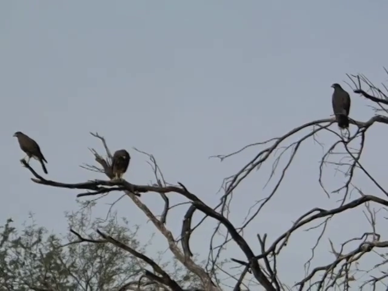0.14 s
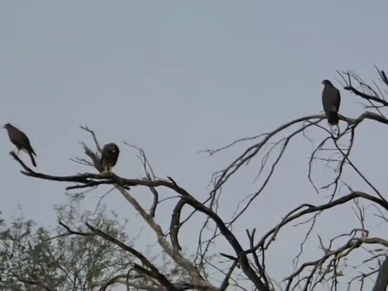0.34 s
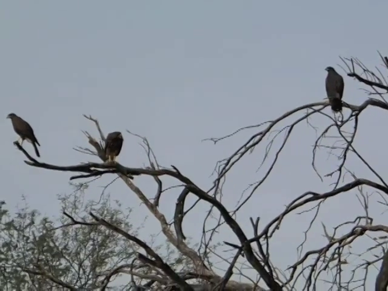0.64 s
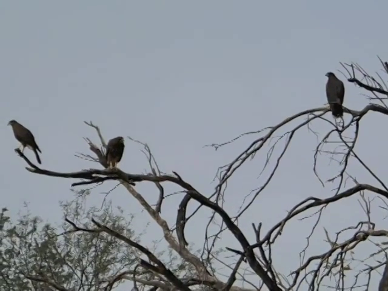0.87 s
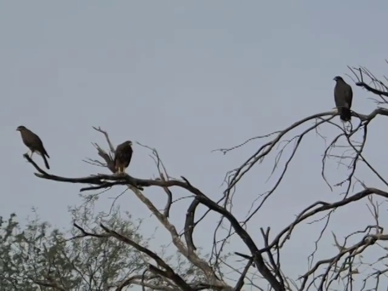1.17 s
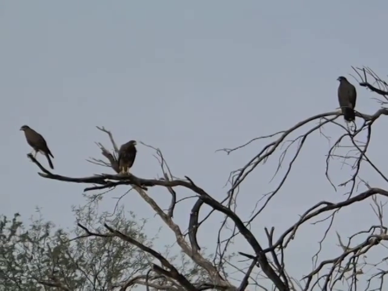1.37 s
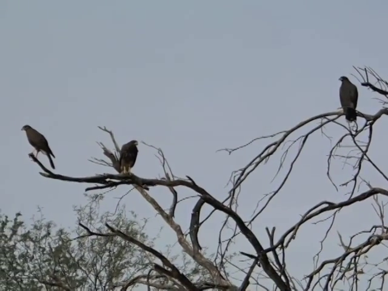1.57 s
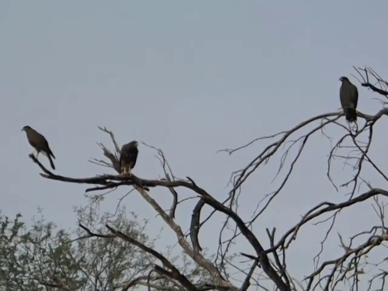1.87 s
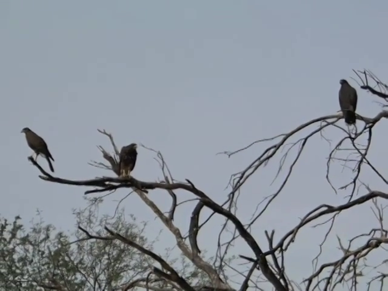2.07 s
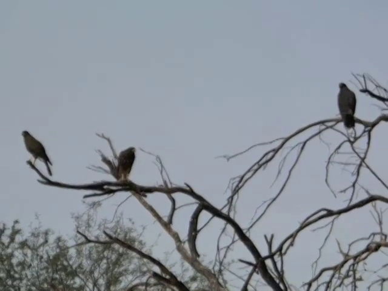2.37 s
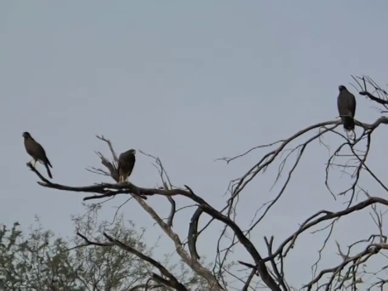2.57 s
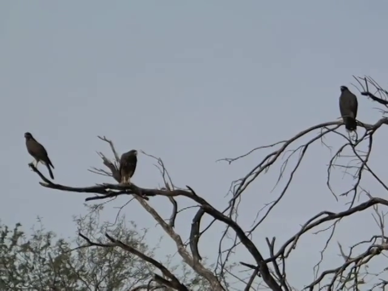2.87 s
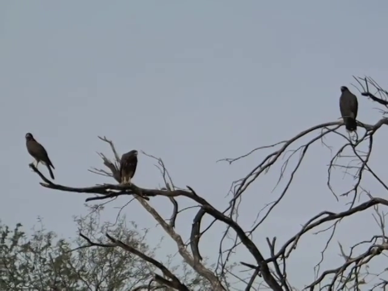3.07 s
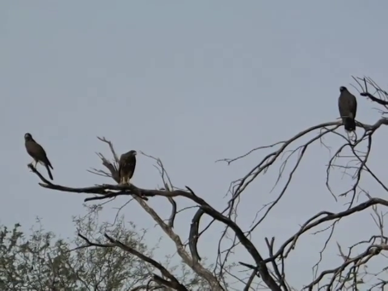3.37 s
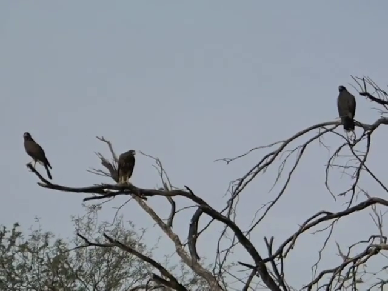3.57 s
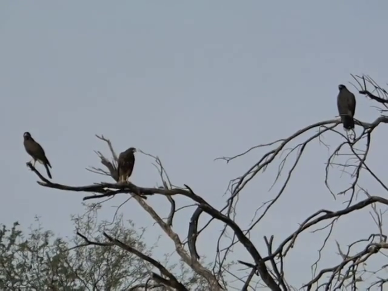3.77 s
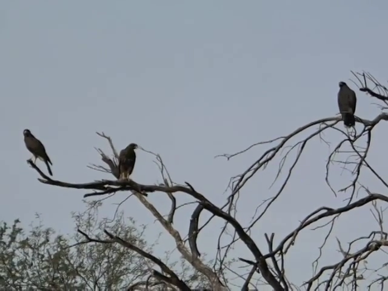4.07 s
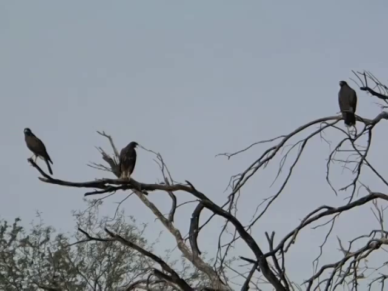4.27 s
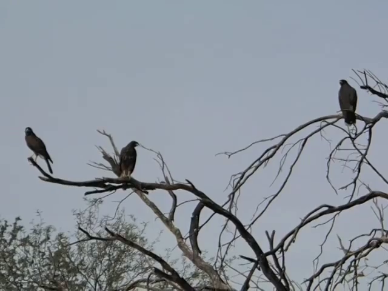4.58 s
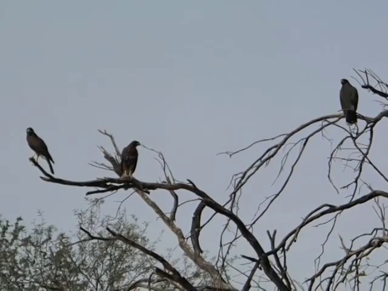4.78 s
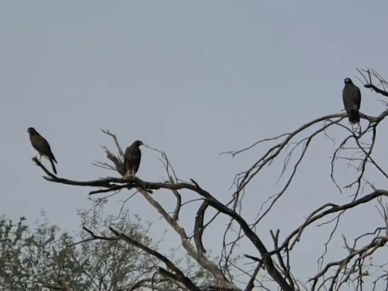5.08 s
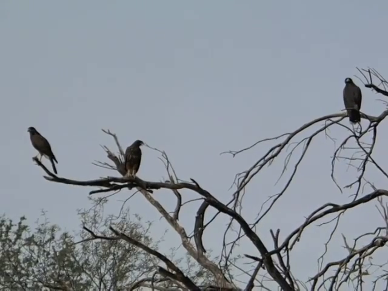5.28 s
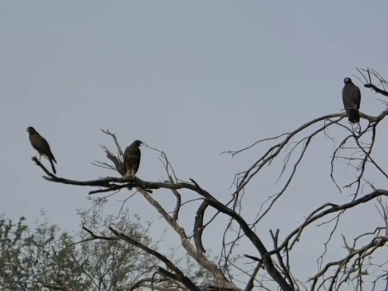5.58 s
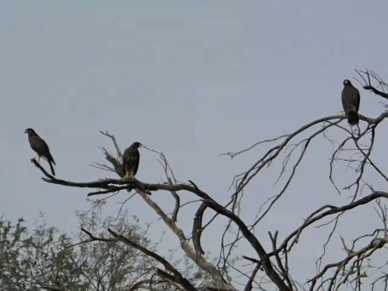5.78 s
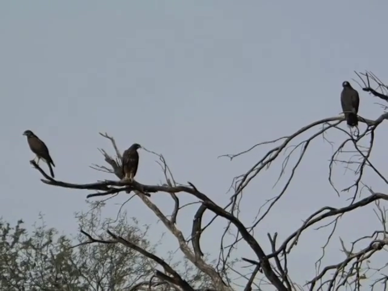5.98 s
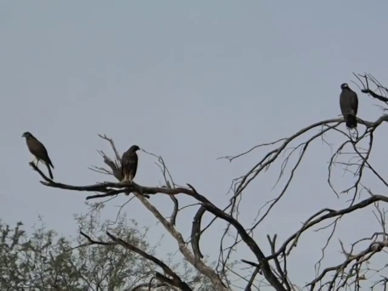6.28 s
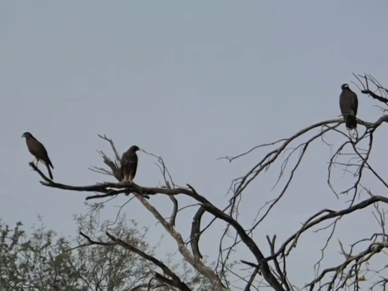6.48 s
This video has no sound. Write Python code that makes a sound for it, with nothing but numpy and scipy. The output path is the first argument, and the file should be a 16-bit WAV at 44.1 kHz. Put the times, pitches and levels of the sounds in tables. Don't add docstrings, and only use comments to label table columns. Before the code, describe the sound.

A young hawk gives five rising, slightly hoarse whistled squeals outdoors while a camera's lens motor ticks and whines and fingers rustle close by.

```python
import sys
import numpy as np
from scipy import signal
from scipy.fft import rfft, irfft, next_fast_len
from scipy.io import wavfile
from scipy.ndimage import uniform_filter1d, map_coordinates

SR = 44100
rng = np.random.default_rng(int(sys.argv[2]) if len(sys.argv) > 2 else 0)


def to_wav(s):
    ch = np.atleast_2d(s).T
    pcm = np.round(np.clip(ch, -1, 1) * 32767)
    wavfile.write(sys.argv[1], SR, pcm.astype(np.int16))


def volts_from_decibels(level):
    exponent = np.asarray(level, float) / 20
    return 10 ** exponent


N = 292824
T = np.arange(N) / SR


def unit(x):
    return x / np.sqrt(np.mean(x ** 2) + 1e-20)


def along(points, hz):
    f, v = np.transpose(points)
    return np.interp(np.log(hz + 1), np.log(f + 1), v)


def curves(rows):
    s, *cols = np.transpose(rows)
    gate = np.clip(np.minimum(T - s[0], s[-1] - T) / 0.00099, 0, 1)
    return [gate] + [np.interp(T, s, c) for c in cols]


def wobble(rate):
    return map_coordinates(rng.standard_normal(int(N * rate / SR) + 4), [T * rate])


def filtered(x, response):
    m = next_fast_len(N + SR // 2)
    return irfft(rfft(x, m) * response(np.fft.rfftfreq(m, 1 / SR)), m)[..., :N]


def modes(table):
    def response(f):
        total = 0
        for k, (center, width, db) in enumerate(table):
            damping = 1j * f * width
            total = total + (-1) ** k * volts_from_decibels(db) * damping / (center ** 2 - f * f + damping + 1)
        return total
    return response


def turns(hz):
    return 2 * np.pi * np.cumsum(hz) / SR


def narrow(width_hz):
    pair = filtered(rng.standard_normal((2, N)), lambda f: 1 / (1 + (f / width_hz) ** 2))
    return (pair[0] + 1j * pair[1]) / np.sqrt(np.mean(pair ** 2) * 2)


# f/Hz, likeness [-1..1]
LIKENESS = [(60, 0.71), (130, 0.89), (290, 0.084), (1400, 0.067), (15000, 0.022)]


def rush(spectrum, patchy_db):
    z = signal.stft(rng.standard_normal((2, N)), nperseg=512)[2]
    field = rng.standard_normal(z.shape[1:])
    field = uniform_filter1d(uniform_filter1d(field, 6, 0), 10, 1)
    pair = signal.istft(z * volts_from_decibels(patchy_db * unit(field)), nperseg=512)[1][:, :N]

    def mid_and_side(hz):
        turn = np.arccos(np.clip(along(LIKENESS, hz), -1, 1)) / 2
        return volts_from_decibels(along(spectrum, hz)) * [np.cos(turn), np.sin(turn)]
    mid, side = filtered(pair, mid_and_side)
    return unit(np.array([mid + side, mid - side]))


# f/Hz, level/dB [dB per Hz]
RUMBLE_SPECTRUM = [(15, -27), (60, -5.5), (200, -4), (900, -3.5), (1700, -8.5), (3000, -11), (4600, -16),
                   (16000, -24.5)]
INSECT_SPECTRUM = [(3000, -90), (4200, -22), (4800, -6), (5500, 0), (6200, -6), (7200, -30), (9000, -90)]
HISS_SPECTRUM = [(2000, -35), (4100, 9), (5000, 0.5), (8000, -1), (12000, -0.5), (15800, -2)]
# t/s, level/dB
INSECT_SWELLS = [
    (0, -60),
    (.7, -61.5),
    (1.44, -65.5),
    (1.7, -60),
    (4.84, -68.5),
    (6.64, -65.5),
]


def open_air():
    rumble = volts_from_decibels(-53.5 + 0.35 * wobble(1.94)) * rush(RUMBLE_SPECTRUM, patchy_db=0.63)
    engine_hz = 132 + 3 * wobble(3.4)
    hum = volts_from_decibels(-68) * np.imag((1 + 0.42 * narrow(9.4)) * np.exp(1j * turns(engine_hz)))
    swell_db = curves(INSECT_SWELLS)[1]
    insects = volts_from_decibels(swell_db + 2.5 + 2.4 * wobble(40)) * rush(INSECT_SPECTRUM, patchy_db=2.5)
    return rumble + hum + insects + volts_from_decibels(-58) * rush(HISS_SPECTRUM, patchy_db=1.0)


FRAME_S = 1001 / 30000


def beats(first, last, frames):
    return first + frames * FRAME_S * np.arange(round((last - first) / (frames * FRAME_S)) + 1)


# first t/s, last t/s, lens ring peak level/dB, housing peak level/dB
MOTOR_RUNS = [
    (1.5443, 1.744, -36.5, -43.5),
    (1.81, 1.877, -31.5, -44),
    (2.4434, 3.578, -33.5, -42),
]
SOFT_STEPS = [2.443, 2.643, 2.777, 3.11, 3.177, 3.377]
# t/s, lens ring peak level/dB, housing peak level/dB
MOTOR_KNOCKS = [(0.212, -44, -55), (0.2131, -25, -54), (1.4082, -43, -68), (1.439, -36.5, -42.5),
                (1.939, -38, -59.5), (2.105, -38, -43), (2.305, -42, -62), (2.3123, -19.5, -40),
                (2.3183, -38, -40.5), (2.3268, -20.5, -31.5), (2.5475, -56, -60), (2.681, -44, -52),
                (3.4574, -53, -73), (3.5497, -50, -57), (3.6426, -44.5, -69)]
# t/s after the step, level/dB
STEP_BOUNCES = [(.0003, -5), (.00134, 5.5), (.0024, -4), (.0037, -6), (.0062, -10)]


def motor_blows():
    dull, bright = np.zeros(N), np.zeros(N)
    blows = []
    for first, last, ring_db, dull_db in MOTOR_RUNS:
        for s in beats(first, last, 2):
            is_soft = np.abs(s - np.array(SOFT_STEPS)).min() < FRAME_S / 2
            blows.append((s, ring_db - 3.5 * is_soft, dull_db))
    blows += MOTOR_KNOCKS
    for s, bright_db, dull_db in blows:
        size_db = 0.6 * rng.standard_normal()
        for late, bounce_db in STEP_BOUNCES:
            chance = rng.standard_normal()
            at = round((s + late + .00002 * chance) * SR)
            bounce = bounce_db + .5 * chance + size_db
            dull[at] -= volts_from_decibels(dull_db + bounce + 27.0)
            bright[at] -= volts_from_decibels(bright_db + bounce + 25.0)
    return dull, bright


# first t/s, last t/s, spacing [frames], f/Hz, level/dB
COIL_WHINES = [(.29, .29, 1, 4600, -55), (1.512, 1.546, 1, 4820, -52), (1.571, 1.571, 1, 6220, -54),
               (1.643, 1.643, 1, 4820, -54), (1.882, 1.882, 1, 4820, -53), (2.413, 2.447, 1, 4820, -51.5),
               (2.477, 2.611, 1, 6220, -55), (2.646, 2.713, 2, 4820, -53), (2.675, 2.809, 2, 6220, -58),
               (3.278, 3.545, 2, 4820, -54), (3.379, 3.513, 2, 6220, -57), (3.574, 3.608, 1, 6220, -56.5)]
# t/s, length [s], f/Hz, level/dB
LONG_WHINE = (2.11, .19, 5820, -53)


def coil_whine():
    whine = np.zeros(N)
    bursts = [(s, .022, hz, db) for first, last, frames, hz, db in COIL_WHINES
              for s in beats(first, last, frames)]
    for s, length, hz, db in bursts + [LONG_WHINE]:
        t = np.arange(int(length * SR)) / SR
        edges = np.clip(np.minimum(t, length - t) / 0.0014, 0, 1)
        whine[round(s * SR):][:len(t)] += volts_from_decibels(db) * edges * np.sin(2 * np.pi * hz * t)
    return whine


# t/s, level/dB
GEAR_BUZZ = [
    (0.22, -42),
    (0.222, -46),
    (0.258, -41.5),
    (0.264, -57),
]
# f/Hz, width/Hz, level/dB
HOUSING_MODES = [(990, 225, -3), (1960, 400, 2), (2723, 157, 10), (3640, 660, 1.5)]
LENS_RING_MODES = [(5150, 660, 5.5), (6700, 350, -6), (7300, 900, -14)]


def lens_motor():
    dull, bright = motor_blows()
    gate, buzz_db = curves(GEAR_BUZZ)
    teeth = rng.standard_normal(N) * volts_from_decibels(2.9 * wobble(500))
    buzz = gate * volts_from_decibels(buzz_db) * unit(filtered(teeth, lambda f: modes([(5650, 1000, 0)])(f) ** 2))
    soft = lambda f: 1 / (1 + 1j * f / 7000) ** 4
    t = np.clip(T - 2.335, 0, None)
    thump = volts_from_decibels(-53 - 60 * t / .12) * np.sin(2 * np.pi * 58 * t)
    housing = filtered(dull, lambda f: soft(f) * modes(HOUSING_MODES)(f)) + thump
    ring = filtered(bright, lambda f: soft(f) * modes(LENS_RING_MODES)(f))
    near = housing * volts_from_decibels([[.4], [-.4]]) + ring * volts_from_decibels([[-1.5], [1.5]])
    return near + (coil_whine() + buzz) * volts_from_decibels([[-2.2], [2.2]])


# t/s, length [s], last f/Hz, peak level/dB, gasp level/dB
LEAD_INS = [
    (.35, 0.076, 2600, -36, -54),
    (2.788, .048, 2556, -36, -44),
    (4.019, 0.032, 2555, -40.5, -49),
]
# share of its length, then level/dB over the peak of partials 1, 2 and 3
LEAD_SHAPE = [(0, -15, -30, -27), (.22, -6.5, -8, -14.5), (.68, 0, -6.5, -25), (1, -6.5, -21, -42)]


def lead_ins(flutter, waver_hz, breath):
    out = np.zeros(N)
    rasp = np.imag(narrow(150) * np.exp(2j * np.pi * 3250 * T))
    puff = np.imag(narrow(450) * np.exp(2j * np.pi * 2900 * T)) + 0.51 * breath
    for s, length, last_hz, peak_db, gasp_db in LEAD_INS:
        rows = [(s + share * length, *(peak_db + np.array(shape))) for share, *shape in LEAD_SHAPE]
        on = curves(rows)[0] > 0
        gate, db, second_db, third_db = (c[on] for c in curves(rows))
        slide = np.linspace(0, 1, len(db)) ** 0.627
        low = turns(2260 + (last_hz - 2260) * slide + 2 * waver_hz[on])
        note = volts_from_decibels(db) * np.sin(low)
        note += volts_from_decibels(second_db + 130 * length) * np.sin(2 * low)
        note += volts_from_decibels(third_db) * (np.sin(3 * low) + 0.41 * np.sin(4 * low))
        air = volts_from_decibels(db - 15) * breath[on] + volts_from_decibels(db - 14.5) * rasp[on]
        out[on] += gate * (np.sqrt(2) * flutter[on] * note + air)
        gasp = np.sin(np.pi * np.clip((T - s + 0.024) / 0.039, 0, 1))
        out += volts_from_decibels(gasp_db) * gasp * puff
    return out


# start f/Hz, top f/Hz, bend of the climb, end hoarseness level/dB, limp level/dB
SQUEALS = [
    (3242, 3362, 1.8, -47.5, -60),
    (3094, 3365, .9, -45.5, -59),
    (3098, 3380, .98, -45, -56),
    (3010, 3362, .56, -51.5, -56),
    (2990, 3378, .58, -51.5, -58),
]
# [2nd partial over the whistle, dB]
SQUEAL_LEVELS = [
    [(0.424, -38.5, -6), (0.434, -36.5, -12.5), (0.516, -29.5, -7), (0.634, -34.5, -5), (0.676, -31, -6.5),
     (0.698, -31, -3), (0.868, -28, -5.5), (0.882, -39, -4)],
    [(1.601, -42, -24), (1.625, -35, -4.5), (1.735, -28.5, -11.5), (1.815, -27, -5), (1.929, -28, -15),
     (1.943, -29, -5), (2.067, -27.5, -4.5), (2.08, -35, -3)],
    [(2.83, -41, -12), (2.836, -35.5, -9.5), (2.876, -33, -1.5), (2.994, -28.5, -8.5), (3.084, -30.5, -9),
     (3.106, -30, -4.5), (3.248, -26, -5.5), (3.263, -39, -10)],
    [(4.045, -40, -7.5), (4.089, -38, -2), (4.243, -35.5, -8), (4.289, -49, 7), (4.313, -36.5, -4.5),
     (4.453, -36, 2), (4.483, -34.5, -8), (4.494, -41, -7)],
    [(5.255, -44, -10), (5.281, -39, -12), (5.311, -41, -0.5), (5.403, -35.5, -11.5), (5.559, -41, 1),
     (5.621, -28.5, -6), (5.675, -35.5, -6.5), (5.684, -36, -8)],
]
# whistle partial, shake rates above it, level/dB over the hoarseness
SIDE_BANDS = [(1, -1, -1.5), (1, 1, -16), (2, -1, 3), (2, -2, -12.5), (2, 1, -18), (3, -1, -20.5),
              (3, 1, -17), (3, -2, -25.5)]
# frequency [thirds of the whistle], level/dB
LIMP_LINES = [(4, -9), (5, -1), (7, -7)]


def squeals(flutter, waver_hz, breath):
    out = np.zeros(N)
    shake_waver_hz = 25 * wobble(30)
    rough = .65 * narrow(90) + .4 * narrow(350)
    third_swing_db = -60.5 + 3 * wobble(14)
    patches_db = 2.2 * wobble(22)
    crack = sum(volts_from_decibels(db - 11.5 - 20 * np.abs(T - s - length) / .03) for s, length, _, db, _ in LEAD_INS)
    for voice, (start_hz, top_hz, bend, end_db, limp_db) in zip(SQUEAL_LEVELS, SQUEALS):
        on = curves(voice)[0] > 0
        gate, db, opening_db = (c[on] for c in curves(voice))
        since, left = T[on] - voice[0][0], voice[-1][0] - T[on]

        fall_s = .052
        climb = np.clip(since / (since + left - fall_s), 0, 1)
        fall_hz = 267 + 0.398 * (top_hz - start_hz)
        hz = start_hz + (top_hz - start_hz) * climb ** bend
        hz -= fall_hz * np.clip(1 - left / fall_s, 0, 1) ** 1.905
        high = turns(uniform_filter1d(hz, size=300) + waver_hz[on])

        edges = np.clip(1 - since * bend / 0.069, 0, 1) + np.clip(1 - left / 0.022, 0, 1)
        hoarse_db = end_db - 8.5 * (1 - climb) - 13.5 * edges + patches_db[on]
        hoarseness = volts_from_decibels(hoarse_db) + crack[on]

        strain_db = end_db + 47.5
        third_db = third_swing_db[on] - 3.5 * (1 - climb + 2 * edges) + 0.49 * strain_db
        whistle = volts_from_decibels(db) * np.sin(high)
        whistle += volts_from_decibels(db + opening_db) * np.sin(2 * high)
        whistle += volts_from_decibels(third_db) * np.sin(3 * high)
        whistle += volts_from_decibels(third_db - 12 + .9 * strain_db) * np.sin(4 * high)

        settled = np.linspace(.05, 1.1, len(hz))
        shake_hz = 690 + .7 * (hz - 3300) + shake_waver_hz[on]
        shake = (settled + rough[on]) * np.exp(1j * turns(shake_hz))
        powers = {1: shake, -1: np.conj(shake), -2: np.conj(shake) ** 2}
        hoarse = sum(volts_from_decibels(level) * np.imag(np.exp(1j * m * high) * powers[n]) for m, n, level in SIDE_BANDS)
        out[on] += gate * np.sqrt(2) * (flutter[on] * whistle + hoarseness * hoarse)
        out[on] += gate * hoarseness * volts_from_decibels(1.0) * breath[on]

        limp = np.clip(1.3 - 3 * climb, 0, 1) + 1.6 * climb ** .5 * rough[on]
        limp = limp * volts_from_decibels(limp_db - 6 * edges)
        lines = sum(volts_from_decibels(level) * np.exp(1j * k * high / 3) for k, level in LIMP_LINES)
        out[on] += gate * np.imag(limp * lines)
    return out


def hawk():
    flutter, waver_hz = volts_from_decibels(1.07 * wobble(70)), 5 * wobble(90)
    throat = modes([(5650, 800, 0), (4700, 1000, -11)])
    breath = unit(filtered(rng.standard_normal(N), lambda f: throat(f) ** 2))
    return lead_ins(flutter, waver_hz, breath) + squeals(flutter, waver_hz, breath)


# t/s, length [s], start f/Hz, end f/Hz, level/dB
BIRD_SLIDES = [
    (.351, 0.016, 5600, 5770, -42.5),
    (2.785, 0.0089, 5400, 5650, -48),
    (3.685, .02, 5600, 5680, -60),
    (3.846, .016, 4830, 4950, -59),
    (3.8848, 0.0019, 8200, 6400, -45),
    (3.8862, 0.002, 6140, 5600, -35),
    (4.01, .025, 5300, 5850, -62),
    (6.325, .043, 4400, 5400, -62),
    (6.363, 0.037, 4120, 5100, -58),
]
# t/s, length [s], edge f/Hz, top f/Hz, level/dB
BIRD_ARCHES = [
    (3.895, .04, 4330, 5450, -56),
    (5.34, .03, 4400, 4630, -51),
    (5.835, 0.043, 4750, 5330, -51.5),
    (5.919, 0.034, 4330, 4600, -56.5),
]


def small_birds():
    out = np.zeros(N)
    slide = lambda u: u
    arch = lambda u: 1 - (2 * u - 1) ** 2
    for table, path in ((BIRD_SLIDES, slide), (BIRD_ARCHES, arch)):
        for s, length, from_hz, to_hz, db in table:
            u = np.arange(int(length * SR)) / (length * SR)
            chirp = np.sin(turns(from_hz + (to_hz - from_hz) * path(u)))
            out[round(s * SR):][:len(u)] += volts_from_decibels(db) * np.sin(np.pi * u) ** .5 * chirp
    return out * volts_from_decibels(4.9 * wobble(300))


# f/Hz, t60 [s]
SCRUB_DECAY = [(1000, 0.32), (3300, 0.77), (6500, 0.37), (11000, 0.077)]


def scrub(x):
    hz, t, z = signal.stft(rng.standard_normal((2, SR // 2)), SR, nperseg=256)
    far = volts_from_decibels(-60 * t / along(SCRUB_DECAY, hz)[:, None])
    near = volts_from_decibels(6.5 - 60 * t / 0.25)
    tail = signal.istft(z * (far + near), SR, nperseg=256)[1]
    late = np.pad(x, (300, 0))[None]
    return signal.fftconvolve(late, tail / np.linalg.norm(tail[0]), axes=1)[:, :N]


# loudest t/s, level/dB, rise [dB/s], fall [dB/s]
FINGER_STROKES = [
    (.83, -45.5, 1400, 100),
    (1.066, -53, 90, 75),
    (1.452, -62, 170, 114),
    (1.546, -53, 1900, 1500),
    (1.574, -56, 1800, 770),
    (1.614, -49.5, 1000, 60),
    (1.744, -64, 1697, 339),
    (1.838, -44, 241, 360),
    (2.122, -56.5, 60, 190),
    (2.214, -54, 668.5, 220.5),
]
# t/s, peak level/dB, f/Hz
DULL_TAPS = [
    (0.831, -39.5, 584),
    (1.049, -33, 850),
    (1.064, -39, 1140),
    (1.118, -57, 497),
    (2.103, -45, 1780),
    (2.317, -43, 824),
    (2.323, -47, 800),
    (4.577, -41.5, 1420),
]
# f/Hz, level/dB [dB per Hz]
SKIN_SPECTRUM = [(150, -77), (450, 0), (1200, 1), (2000, -4.5), (4000, -58)]


def fingers():
    strokes = sum(volts_from_decibels(db + np.minimum(rise * (T - s), fall * (s - T))) for s, db, rise, fall in FINGER_STROKES)
    grains = rng.standard_normal((2, N)) * volts_from_decibels(4.4 * wobble(260))
    out = strokes * unit(filtered(grains, lambda f: volts_from_decibels(along(SKIN_SPECTRUM, f))))
    t = np.arange(400) / SR
    for s, peak_db, hz in DULL_TAPS:
        tap = volts_from_decibels(peak_db + 2.0 - 60 * t / 0.0085) * np.sin(2 * np.pi * hz * t)
        out[:, round(s * SR):][:, :400] += tap
    return out


def scene():
    birds = hawk() + small_birds()
    outside = birds + volts_from_decibels(-12.5) * scrub(birds) + open_air() + fingers()
    return outside * volts_from_decibels([[-2.3], [2.1]]) + lens_motor()


def low_pass(x):
    return signal.sosfilt(signal.butter(12, 16760, fs=SR, output="sos"), x)


# f/Hz, level/dB
PORT_RESPONSE = [(25, -24), (55, -8), (90, 0), (3400, 0), (3850, -4), (4070, -15), (4350, -4), (4900, 0)]


def record(dry):
    mix = filtered(dry, lambda f: volts_from_decibels(along(PORT_RESPONSE, f)) * (f < 15790))
    return low_pass(mix)


dry = scene()
out = record(dry)
to_wav(out)
```